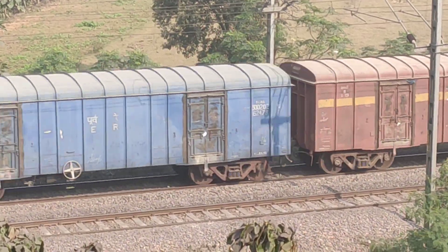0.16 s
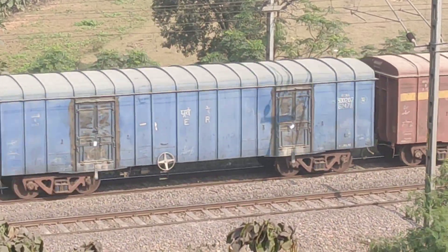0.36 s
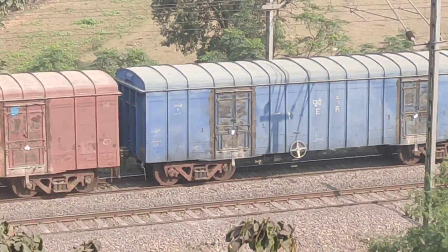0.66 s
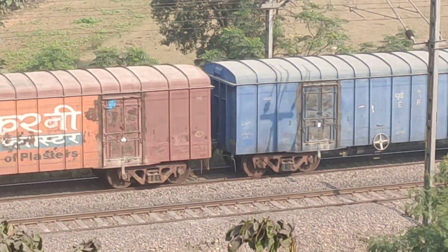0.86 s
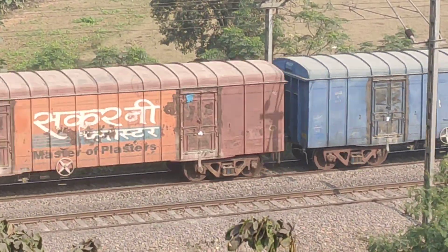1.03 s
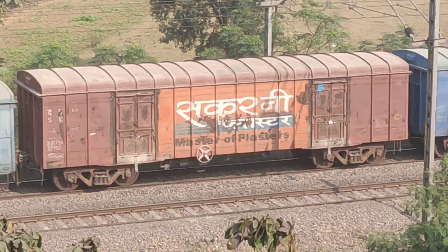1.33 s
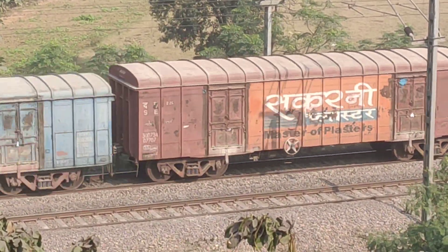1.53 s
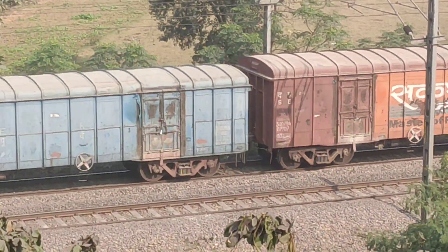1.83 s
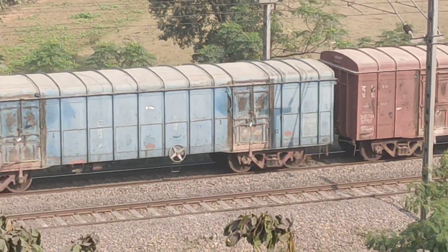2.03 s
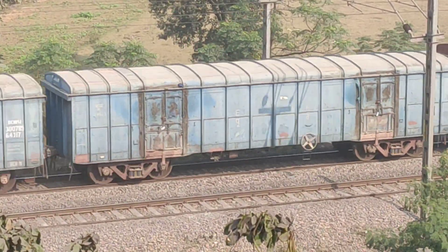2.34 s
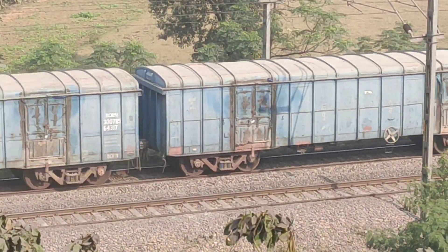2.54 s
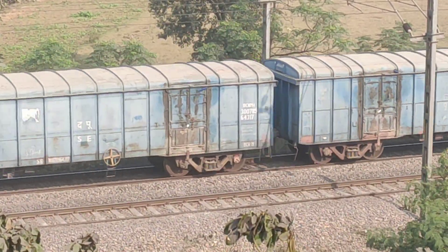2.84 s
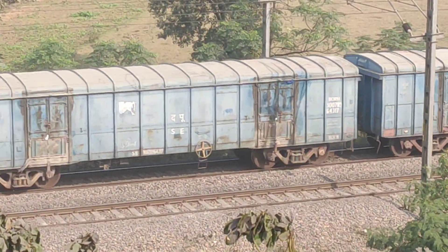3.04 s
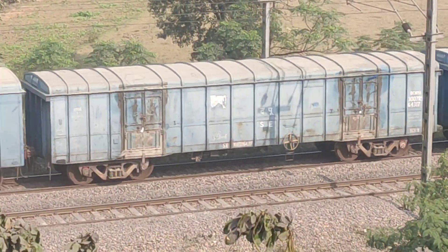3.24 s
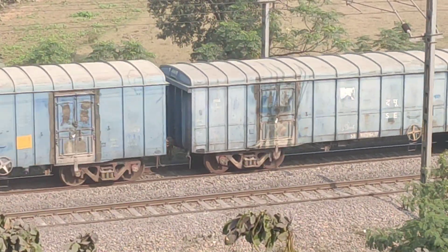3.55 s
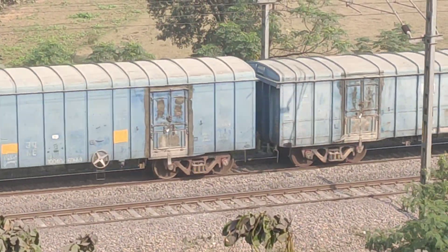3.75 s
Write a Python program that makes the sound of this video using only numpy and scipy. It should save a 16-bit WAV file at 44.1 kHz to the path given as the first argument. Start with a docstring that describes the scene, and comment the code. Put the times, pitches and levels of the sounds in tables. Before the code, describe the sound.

A freight train rolls past some tens of metres away with a steady low rumble throughout. Faint, high wheel squeals come in the first 0.7 seconds, and hissing metal scrapes swell repeatedly, strongest around 1.1 seconds and weaker near 1.8 and 2.7. Wind rumbles and thumps on the microphone from about 1.1 to 2.4 seconds, peaking near 1.5, then gusts again between 3.2 and 3.6 seconds.

```python
"""Freight train passing in gusty wind

Covered wagons roll steadily past, some tens of metres away. Rough wheels ring the rails and
drum the wagon bodies; flanges scrape in swells and squeal briefly as they stick and slip.
Gusts of wind rumble and thump on the microphone."""
import sys
import numpy as np
from scipy.fft import rfft, irfft, next_fast_len
from scipy.io import wavfile

SR = 44100
rng = np.random.default_rng(int(sys.argv[2]) if len(sys.argv) > 2 else 0)


def unload_audio(sound):
    """Save the sound as a 16-bit wav file, at the path given as the first command line argument."""
    columns = np.transpose(np.atleast_2d(sound))
    # keep every value between -1 and 1, then stretch to whole-number steps
    steps = np.round(np.clip(columns, -1, 1) * 32767)
    wavfile.write(sys.argv[1], SR, steps.astype(np.int16))


N = 171108

# spectrum of fine turbulence on the microphone: f/Hz, level/dB
TURBULENCE = [(40, -8), (130, 1), (260, -1.5), (420, -7.5), (700, -14), (1100, -30.5), (2500, -35.5)]


def undb(db):
    """Decibels to gain."""
    return 10 ** (np.asarray(db) / 20)


def unit(x):
    """Scale to rms 1."""
    return x / np.sqrt(np.mean(x ** 2))


def noise(gain):
    """Noise of rms 1 whose spectrum is shaped by gain(Hz)."""
    size = next_fast_len(N, real=True)
    hz = np.maximum(np.arange(size // 2 + 1) * SR / size, 1)
    return unit(irfft(rfft(rng.standard_normal(size)) * gain(hz), size)[:N])


def coloured(points, tilt_db=0):
    """Noise with an EQ curve of (Hz, dB) points, tilted per octave and rolled off below the first."""
    f, db = np.array(points).T

    def gain(hz):
        curve_db = np.interp(np.log(hz), np.log(f), db)
        octaves = np.log2(np.clip(hz, f[0], f[-1]))
        low_cut = hz / np.hypot(hz, f[0] / 2)
        return undb(curve_db + tilt_db * octaves) * low_cut
    return noise(gain)


def ringing(centre_hz, width_hz):
    """A resonance driven by random contact forces."""
    return noise(lambda hz: (1 + 1j * (hz ** 2 - centre_hz ** 2) / (hz * 1.51 * width_hz)) ** -2)


def wobble(rate):
    """Smooth random modulation of rms 1 that changes about rate times a second."""
    return noise(lambda hz: 1 / (1 + (hz / rate) ** 4))


def swell(t, peak, rise, fall):
    """A rounded rise to 1 and a rounded fall."""
    return np.exp(-.5 * ((t - peak) / np.where(t < peak, rise, fall)) ** 2)


def rolling(t):
    """The steady roar of the wagons, and rails that ring louder under rough wheels."""
    # spectrum of the roar: f/Hz, level/dB
    roar_eq = [(25, -7.5), (70, 1.5), (150, -3.5), (300, -9), (420, -11), (560, -19.5), (760, -19.5),
               (950, -19), (1250, -28.5), (2200, -28.5), (3300, -30.5), (5000, -31.5), (7500, -35.5)]
    # resonances of rail and wheel: f/Hz, width/Hz, level/dB
    rail_modes = [(864, 190, 4), (1556, 240, -3), (1845, 210, -3.5), (2616, 380, 2), (4275, 400, -5)]
    # rougher wheelsets going by: t/s, half length/s, ring boost/dB
    rough_wheels = [(.44, 0.15, 4), (1.18, 0.17, 5), (1.6, 0.13, 2), (2.264, .06, 5)]
    roar_db, flutter_db, ring_db, flicker_db = -25.5, 0.18, -41.5, 1.5
    roar = coloured(roar_eq) * undb(roar_db + flutter_db * wobble(13))
    ring = sum(undb(db + flicker_db * wobble(9.2)) * ringing(hz, width) for hz, width, db in rail_modes)
    boost_db = sum(db * swell(t, at, half, half) for at, half, db in rough_wheels)
    return roar + unit(ring) * undb(ring_db + boost_db)


def flange_scrapes(t):
    """Flanges rub the rail: a chattering hiss that rings each wheel at a slightly different pitch."""
    # scrapes: peak t/s, rise/s, fall/s, level/dB, tilt/(dB per octave), ring against hiss/dB
    scrapes = [(.04, 0.13, .14, -35, 1, -9), (.25, 0.035, .06, -35.5, -0.5, -10),
               (.61, 0.048, 0.05, -30, 5, -13), (.805, .005, .1, -30.5, 10, -14),
               (1.0, 0.082, 0.067, -30, 10, -8), (1.122, 0.074, .08, -24.5, 4.5, -10),
               (1.23, 0.047, .11, -31.5, 1, -9), (1.75, 0.015, 0.065, -33, 19, -7),
               (1.9, 0.14, .2, -44.5, -3, -8), (2.66, .06, 0.13, -35.5, 2.5, -11.5),
               (2.92, .1, .07, -40, -6, -9.5), (3.681, 0.15, .15, -41, 2, -11)]
    # spectrum of the rubbing hiss: f/Hz, level/dB
    hiss_eq = [(1200, -24), (2800, -10), (4200, -2.5), (5200, -1.5), (6000, 1), (6800, 0), (7400, -6.5),
               (8200, -0.5)]
    # wheel resonances: f/Hz, width/Hz, level/dB
    wheel_modes = [(4120, 40, -4.5), (4293, 170, -9), (5390, 58, -6), (5680, 45, -12), (5920, 100, -3),
                   (6730, 40, -2.5), (6810, 55, -2.5), (7200, 99, -12), (7180, 100, -3), (7480, 160, 3.5)]
    size_spread, chatter_db = .012, 0.7
    pivot_hz = wheel_modes[-1][0]
    wheel_sizes = 1 + size_spread * rng.uniform(-1, 1, len(scrapes))
    out = 0
    for (at, rise, fall, db, tilt_db, ring_db), size in zip(scrapes, wheel_sizes):
        modes = [(hz / size, width, undb(mode_db + tilt_db * np.log2(hz / pivot_hz)))
                 for hz, width, mode_db in wheel_modes]
        ring = noise(lambda f: sum(gain / (1 + (2 * (f - hz) / width) ** 2) for hz, width, gain in modes))
        rub = coloured(hiss_eq, tilt_db) + undb(ring_db) * ring
        out += undb(db) * swell(t, at, rise, fall) * rub
    return out * undb(chatter_db * wobble(45))


def squeals(t):
    """Stick and slip locks on to one wheel mode for a moment, wavering in pitch and strength."""
    # brief wheel tones: peak t/s, half length/s, f/Hz, level/dB
    tones = [(.16, .04, 7490, -46), (.31, .05, 7470, -49), (.62, .023, 4083, -44), (.615, .025, 6640, -44),
             (.605, .02, 5730, -46), (.66, .06, 7030, -50)]
    waver_hz, waver_db = 9.5, 2
    out = 0
    for at, half, hz, db in tones:
        phase = 2 * np.pi * np.cumsum(hz + waver_hz * wobble(60)) / SR
        envelope = swell(t, at, half, half) * undb(db + waver_db * wobble(40))
        out += np.sqrt(2) * np.sin(phase) * envelope
    return out


def wind(t):
    """Eddies rumble on the microphone; gusts arrive with a finer flurry."""
    # spectrum of the rumble: f/Hz, level/dB
    rumble_eq = [(10, -4), (25, 6), (70, -0.5), (120, -7), (200, -12), (330, -22.5), (600, -41),
                 (1200, -49), (3000, -64.5)]
    # rise and fall of the gusts: t/s, level/dB
    gusts = [(0, -29), (.36, -30), (.48, -21), (.62, -26.5), (.74, -21), (.88, -27.5), (1.05, -22),
             (1.16, -18.5), (1.36, -13), (1.48, -12), (1.62, -14), (1.85, -16.5), (2.02, -16.5),
             (2.42, -16.5), (2.62, -24.5), (3.04, -25), (3.42, -15), (3.88, -24.5)]
    # fine turbulence at the gust fronts: peak t/s, rise/s, fall/s, level/dB
    flurries = [(.06, 0.22, 0.11, -27.5), (.52, 0.13, 0.17, -25.5), (1.145, 0.051, 0.16, -18.5),
                (1.45, 0.09, 0.11, -40.5), (2.1, .2, 0.23, -26.5), (3.35, 0.018, 0.092, -29)]
    eddy_db, eddies_per_s = 1.68, 19
    rumble = coloured(rumble_eq) * undb(np.interp(t, *np.array(gusts).T))
    fronts = sum(undb(db) * swell(t, at, rise, fall) for at, rise, fall, db in flurries)
    flurry = coloured(TURBULENCE) * fronts
    return (rumble + flurry) * undb(eddy_db * wobble(eddies_per_s))


def buffets(t):
    """A strong eddy shakes the microphone: a slow push, a few cycles of flutter and a short rush."""
    # wind thumps: t/s, length/s, flutter f/Hz, level/dB, rush against flutter/dB
    thumps = [(1.125, 0.045, 141.3, -17.5, -1.5), (1.255, 0.022, 60, -14.5, -5),
              (1.347, 0.034, 45.5, -13, -11), (1.41, 0.037, 110, -14.5, -7), (1.455, 0.039, 34.2, -9, -12),
              (1.513, 0.032, 82, -13, -11), (1.576, 0.047, 55.8, -10.5, -11.5),
              (1.705, .045, 87.7, -14, -2.5), (1.98, 0.015, 90, -10.5, -19),
              (2.034, 0.015, 70.5, -18, -3.5), (2.27, 0.032, 132.5, -16, -6.5),
              (3.175, 0.027, 97, -10, -12.5), (3.564, 0.02, 115.5, -7.5, -12)]
    attack_s, push_db, push_hz = 0.0026, -2.5, 21
    out, rush = 0, coloured(TURBULENCE)
    for at, length, hz, db, rush_db in thumps:
        age = np.maximum(t - at, 0)
        envelope = (1 - np.exp(-age / attack_s)) * np.exp(-(age / length) ** 2)
        flutter_hz = hz * (1 + 0.22 * wobble(73))
        flutter = np.sqrt(2) * np.sin(2 * np.pi * np.cumsum(flutter_hz * (t > at)) / SR)
        push = undb(push_db) * np.sin(2 * np.pi * push_hz * age)
        out += undb(db) * envelope * (flutter + push + undb(rush_db) * rush)
    return out


def scene():
    """Train and wind, mixed in mono."""
    t = np.arange(N) / SR
    return (rolling(t) + flange_scrapes(t) + squeals(t) + wind(t) + buffets(t))[None]


def record(dry):
    """Soft-clip the largest swings, then cut the top end steeply."""
    ceiling, top_hz = .85, 7650
    rounded = dry / (1 + (dry / ceiling) ** 4) ** (1 / 4)
    hz = np.arange(N + 1) * SR / (2 * N)
    low_pass = 1 / np.sqrt((1 + (hz / top_hz) ** 56) * (1 + (hz / (1.09 * top_hz)) ** 260))
    return irfft(rfft(rounded, 2 * N) * low_pass)[:, :N]


dry = scene()
out = record(dry)
unload_audio(out)
```